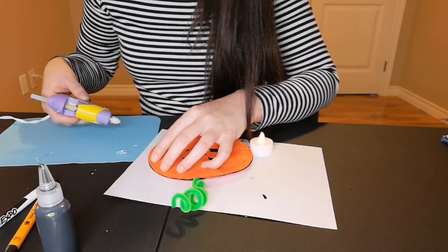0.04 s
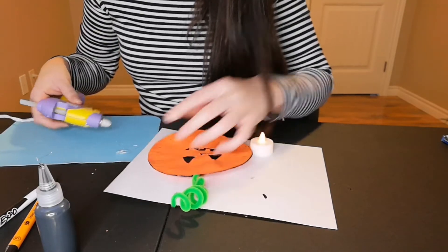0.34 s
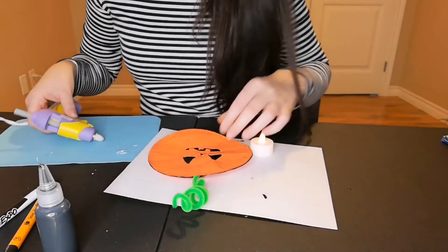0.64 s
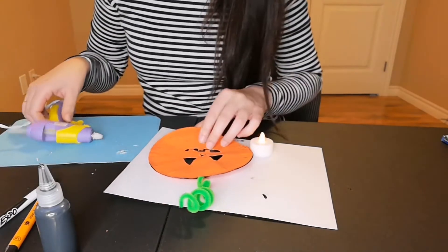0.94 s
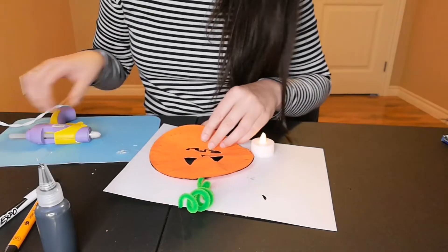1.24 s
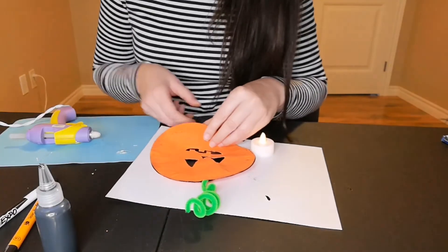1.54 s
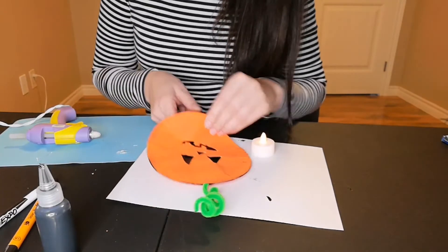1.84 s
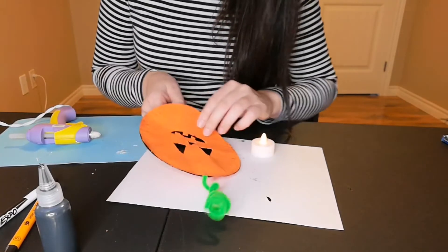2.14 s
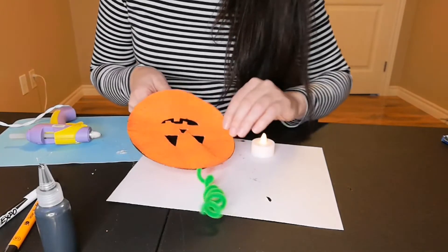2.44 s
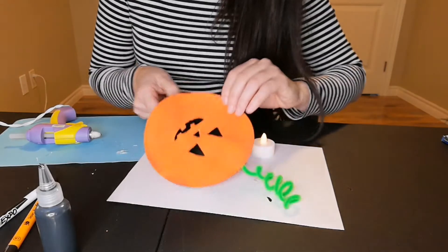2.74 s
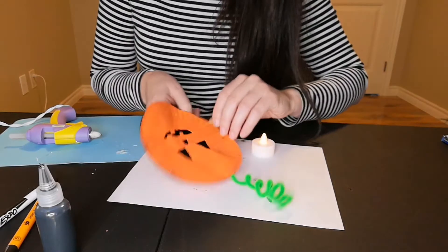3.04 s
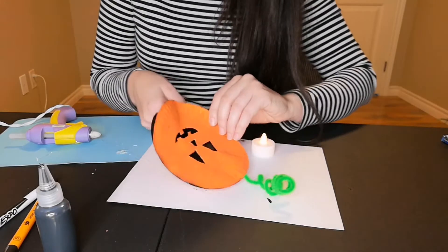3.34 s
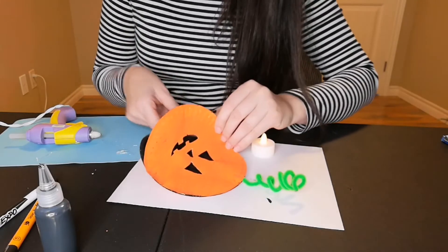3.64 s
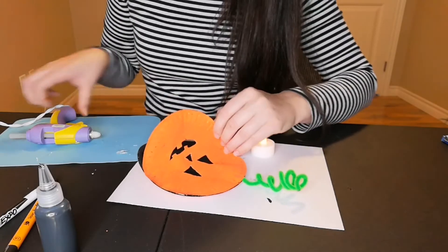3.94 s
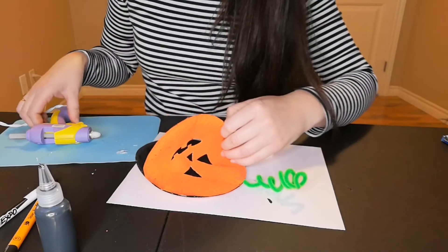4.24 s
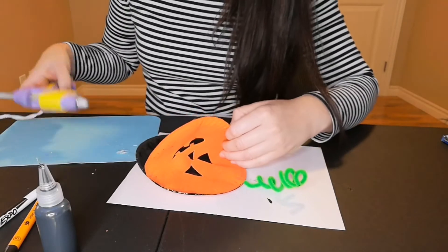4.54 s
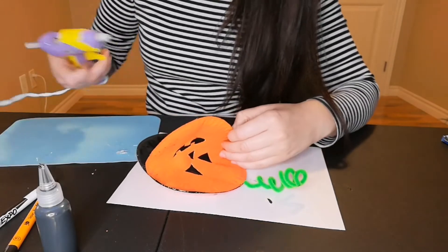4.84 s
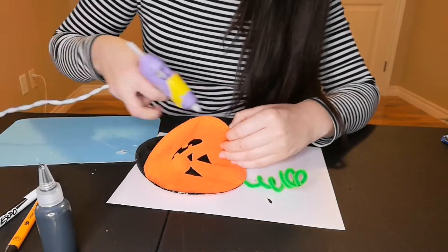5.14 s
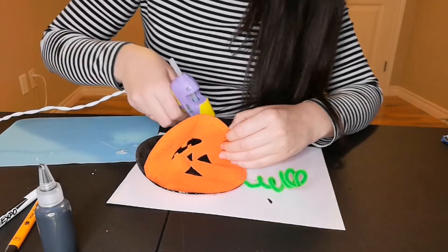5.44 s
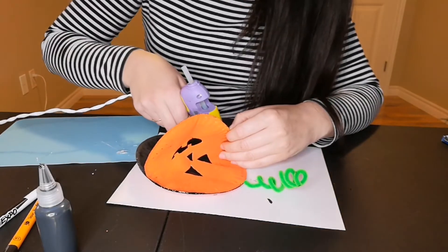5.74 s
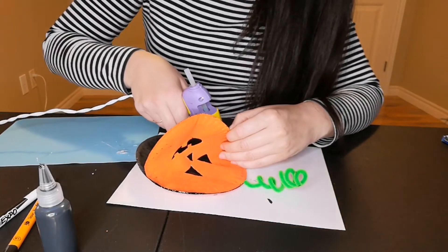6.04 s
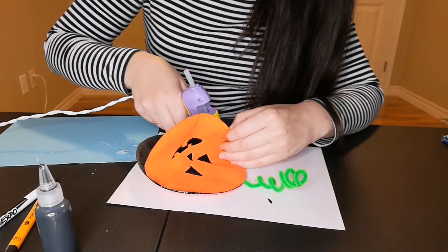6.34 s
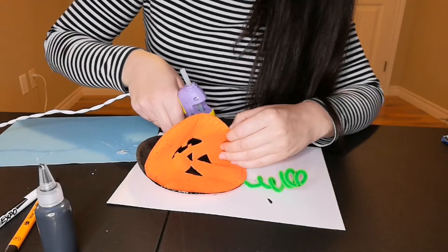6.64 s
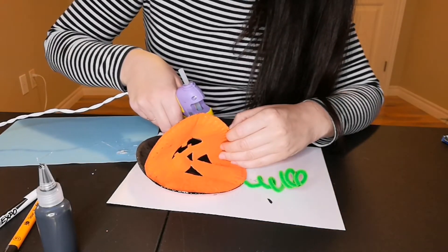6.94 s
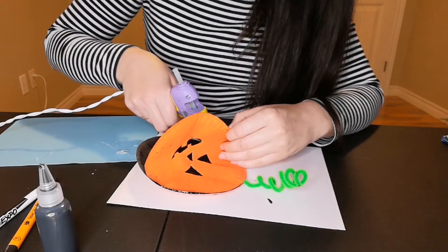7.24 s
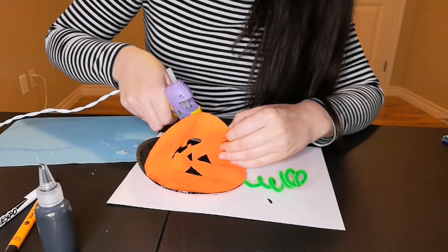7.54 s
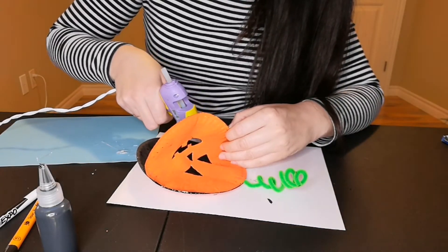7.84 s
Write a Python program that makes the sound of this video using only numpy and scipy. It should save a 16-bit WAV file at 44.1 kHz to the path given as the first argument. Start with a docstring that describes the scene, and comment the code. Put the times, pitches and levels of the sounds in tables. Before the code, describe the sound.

Craft work is heard from nearby in a bare, echoing room, over a faint low hum, rumble and hiss. In the first half second a plastic glue gun gives several light, sharp clicks, followed by soft bumps. At about 1.2 seconds it is set down with a double knock, the loudest sound, briefly ringing the table top. From 1.5 to 4.2 seconds a paper plate is turned and slid over a sheet of paper in quiet, uneven rustles and flutters, with single clicks near 2.8 and 3.6 seconds. From 4.3 to 5.4 seconds the gun is picked up, slightly to the left, with a busy run of plastic clicks, small knocks and its cord juddering over the table. The trigger ticks three times between 5.6 and 5.9 seconds, each louder. After that only the faint hum and hiss remain until about 8 seconds.

```python
"""A bare, echoing room, craft work at a table, over faint mains hum, rumble and hiss.
A paper plate is lifted, turned and slid over a sheet of paper: fibres slip, the plate flutters.
A plastic glue gun clicks and is set down with a double knock that rings the table top.
It is picked up again, its cord juddering over the table, and squeezed: the trigger ticks."""
import sys
import numpy as np
from scipy import signal
from scipy.fft import rfft, irfft, next_fast_len
from scipy.io import wavfile
from scipy.ndimage import uniform_filter1d, map_coordinates

SR = 44100
rng = np.random.default_rng(int(sys.argv[2]) if len(sys.argv) > 2 else 0)


def transcribe(signal):
    """Save signal, clipped to [-1, 1], as a 16-bit WAV file at the path in sys.argv[1]."""
    frames = np.atleast_2d(signal).T
    limited = np.clip(frames, -1, 1)
    pcm = np.round(limited * 32767).astype(np.int16)
    wavfile.write(sys.argv[1], SR, pcm)


N = 356679
GUN_LEAD_MS, PLATE_LEAD_MS = 0.16, -0.027  # left ear ahead of right

# hard plastic contact spectrum: freq_hz, level_db
CRACK_SPECTRUM = [(200, -34), (550, -19.5), (1200, -18), (1800, -6), (2200, -5.5), (2700, 0), (3400, -3.5),
                  (4100, -4), (5800, -3.5), (7600, -3.5), (9000, -7.5), (10800, -9.5), (15000, -20.5)]


def amp(db):
    """Decibels to gain."""
    return 10 ** (np.asarray(db) / 20)


def unit(x):
    """Scale to rms 1."""
    return x / np.sqrt(np.mean(x ** 2) + 1e-20)


def along(points, hz):
    """Interpolate (freq_hz, value) points on a log axis."""
    freqs_hz, values = np.transpose(points)
    return np.interp(np.log(hz + 1), np.log(freqs_hz + 1), values)


def wobble(rate_hz):
    """Smooth random curve, rate_hz knots a second."""
    knots = rng.standard_normal(int(N * rate_hz / SR) + 4)
    return map_coordinates(knots, [np.arange(N) * rate_hz / SR])


def filtered(x, response):
    """Zero-phase filter with gain response(hz)."""
    n = x.shape[-1]
    size = next_fast_len(n + 8192)
    return irfft(rfft(x, size) * response(np.fft.rfftfreq(size, 1 / SR)), size)[..., :n]


def coloured(x, spectrum):
    """Shape by a (freq_hz, level_db) spectrum; rms 1."""
    return unit(filtered(x, lambda hz: amp(along(spectrum, hz))))


def treble(x, edge_hz=4600):
    """High-pass."""
    return filtered(x, lambda hz: 1 - 1 / (1 + (hz / edge_hz) ** 4))


def peak(offset, half_width):
    """Resonance curve of height 1."""
    return 1 / (1 + (offset / half_width) ** 2)


def add(track, start_s, sound):
    """Mix a sound in at start_s."""
    part = track[:, round(start_s * SR):][:, :sound.shape[-1]]
    part += sound[:, :part.shape[-1]]


def ring(modes, t, scatter_db, spread_hz=450):
    """Damped modes at scattered levels; phase between the ears widens with frequency."""
    out = np.zeros((2, len(t)))
    for hz, db, t60_s in modes:
        phase = np.arctan(hz / spread_hz) * rng.choice([-1, 1]) * np.array([[.5], [-.5]])
        envelope = amp(db + scatter_db * rng.standard_normal() - 60 * t / t60_s)
        out += envelope * np.sin(2 * np.pi * hz * t + phase)
    return out


def grains(rate_hz, spread_db):
    """Stick-slip: tiny releases, random in time and size."""
    slips = (rng.random(N) < rate_hz / SR) * rng.standard_normal(N)
    return unit(slips * amp(spread_db * np.clip(rng.standard_normal(N), -2, 2)))


def stroke(start_s, rise_s, release_s):
    """Hand push: speed builds, then falls 27 dB per release_s."""
    age_s = np.arange(N) / SR - start_s
    attack = np.sin(np.pi / 2 * np.clip(age_s / rise_s, 0, 1)) ** 2
    return attack * amp(-27 * np.maximum(age_s - rise_s, 0) / release_s)


def snap(gain, size=2048):
    """Minimum-phase pulse shaped by gain(hz); energy 1, padded to 1 s."""
    cepstrum = irfft(np.log(np.maximum(gain(np.fft.rfftfreq(size, 1 / SR)), 1e-6)))
    cepstrum[1:size // 2] *= 2
    cepstrum[size // 2 + 1:] = 0
    pulse = irfft(np.exp(rfft(cepstrum)))
    return np.pad(pulse / np.linalg.norm(pulse), (0, SR - size))


def skidding(colour, skid_db=14, t60_s=0.01, size=2048):
    """Parts crack and skid as they meet: spread in time, same colour; energy 1."""
    t = np.arange(size) / SR
    skid = rng.standard_normal(size) * amp(-60 * t / t60_s)
    touch = (t == 0) + amp(skid_db) * skid / np.linalg.norm(skid)
    ripple = np.sqrt(np.abs(uniform_filter1d(np.abs(rfft(touch)) ** 2, size=3)))
    contact = signal.fftconvolve(snap(lambda hz: colour(hz) / ripple, size), touch)[:SR]
    return contact / np.linalg.norm(contact)


def in_room(x, wet_db, left_db, lead_ms, mono_hz=430):
    """Direct sound plus a diffuse tail, alike at both ears only in the bass."""
    # room decay: freq_hz, t60_s
    decay = [(100, 0.66), (400, 0.55), (1500, 0.86), (4000, 0.57), (8000, 0.48), (15000, 0.26)]
    hz, t, tail = signal.stft(rng.standard_normal((2, SR * 3 // 4)), SR, nperseg=256)
    tail = tail * amp(-60 * t / along(decay, hz)[:, None]) * (1 - np.exp(-t / 0.0025))
    tail *= 1 + np.exp(-t / 0.0038)  # table and near walls answer first
    width_rad = np.arccos(peak(hz[:, None], mono_hz)) / 2
    mid, side = signal.istft(tail * np.array([np.cos(width_rad), np.sin(width_rad)]), SR, nperseg=256)[1]
    response = amp(wet_db) * np.array([mid + side, mid - side]) / np.linalg.norm(mid + side)
    lead_samples = np.array([[.5], [-.5]]) * lead_ms * SR / 1000
    direct = np.sinc(np.arange(-16, 17) + lead_samples) * np.hanning(33)
    add(response, 0, direct)
    heard = signal.fftconvolve(x[None], response, axes=1)[:, :len(x)]
    return heard * amp([[left_db / 2], [-left_db / 2]]) / np.sqrt(1 + amp(wet_db) ** 2)


def moving(x, wet_db, left_db, lead_ms, spots=3):
    """Moving source: crossfades among spots, each with its own echoes."""
    shares = np.array([wobble(45) for _ in range(spots)])
    shares /= np.linalg.norm(shares, axis=0)
    return sum(in_room(np.roll(x * share, 100 * k), wet_db, left_db, lead_ms)
               for k, share in enumerate(shares))


def patchy(x, depth_db):
    """A rub's colour shifts as the contact point moves."""
    frames = signal.stft(x, nperseg=512)[2]
    patches = uniform_filter1d(rng.standard_normal(frames.shape), size=6, axis=0)
    patches = uniform_filter1d(patches, size=22, axis=1)
    return unit(signal.istft(frames * amp(depth_db * unit(patches)), nperseg=512)[1][:N])


def background():
    """Mains hum, uneven low rumble, soft hiss."""
    # hum tones: freq_hz, level_db
    hum_tones = [(121.5, 3.5), (68, -12), (692, -13.5)]
    # slow swell and fade: time_s, level_db
    hum_levels = [(0, -77.5), (3, -71), (5.7, -68.5), (6.5, -68.5), (7.5, -75.5)]
    hiss_levels = [(1.5, -68), (5.7, -67), (8, -72)]
    # room noise spectra: freq_hz, level_db
    rumble_spectrum = [(11, -43), (18, -10), (59, 1.5), (86, -28), (102, -5), (123, -7.5), (146, -42),
                       (200, -29), (260, -42.5), (440, -120)]
    hiss_spectrum = [(94, 4.5), (160, -1), (183, -2), (205, -10), (239, -2), (284, -10.5), (319, -3.5),
                     (495, -10.5), (534, -7.5), (698, -7), (1500, -16), (3420, -19.5), (8400, -30.5),
                     (15500, -37.5)]
    t = np.arange(N) / SR
    hum = sum(amp(db + 1.7 * wobble(1.6)) * np.sin(2 * np.pi * hz * t + 0.32 * wobble(2.6))
              for hz, db in hum_tones)
    hum *= amp(np.interp(t, *np.transpose(hum_levels)))
    rumble = coloured(rng.standard_normal(N) + 0.2 * rng.standard_normal((2, N)), rumble_spectrum)
    rumble *= amp(-70 + 1.6 * wobble(23))
    hiss = coloured(.5 * rng.standard_normal(N) + rng.standard_normal((2, N)), hiss_spectrum)
    hiss *= amp(np.interp(t, *np.transpose(hiss_levels)))
    return (hum + rumble) * amp([[2.5], [-3.5]]) + hiss * amp([[1.2], [-1.2]])


def drags():
    """Gun, cord and fingers judder over the table: coarse slips drive the board, fine ones scratch."""
    # rubs: start_s, rise_s, release_s, body_db, scratch_db
    rubs = [(0, 0.049, 0.54, -75, -72.5), (0.809, 0.051, 0.14, -65, -66),
            (4.583, 0.01, 0.079, -48.5, -48.5), (4.64, 0.05, 1, -55, -59),
            (4.862, 0.011, 0.12, -49.5, -48.5), (4.96, 0.038, 0.17, -57, -47),
            (5.072, 0.0048, 0.028, -44, -44.5), (5.248, 0.0067, 0.14, -41.5, -62)]
    # board and surface spectra: freq_hz, level_db
    body_spectrum = [(59, -67.5), (100, -4), (140, 5), (193, -6), (224, 3.5), (260, -10), (374, -5),
                     (417, -19.5), (561, 0), (1310, -13.5), (2500, -21.5), (3250, -51.5), (5500, -120)]
    scratch_spectrum = [(700, -3.5), (1200, -0.5), (3000, -3), (5000, -6.5), (8000, -25), (11000, -13),
                        (15000, -65)]
    body, scratch = np.zeros(N), np.zeros(N)
    for start_s, rise_s, release_s, body_db, scratch_db in rubs:
        speed = stroke(start_s, rise_s, release_s)
        body += amp(body_db) * speed
        scratch += amp(scratch_db) * speed
    judder = amp(2 * wobble(45))
    body *= coloured(judder * grains(rate_hz=600, spread_db=2.5), body_spectrum)
    fine_slips = patchy(judder * grains(rate_hz=1900, spread_db=2), depth_db=1.5)
    scratch *= coloured(fine_slips, scratch_spectrum)
    return (in_room(body, wet_db=-4, left_db=9, lead_ms=GUN_LEAD_MS)
            + in_room(scratch, wet_db=2, left_db=3, lead_ms=GUN_LEAD_MS))


def plate():
    """Paper fibres catch and slip as the plate turns; bending adds a hollow flutter."""
    # strokes on paper and fingers:
    # start_s, rise_s, release_s, level_db, treble_db, flex_db, band_hz, band_db
    strokes = [(0, .01, 0.54, -80, -8, -66.5, 2520, -8), (.88, 0.049, 1, -80.5, 7.5, -81, 3350, 8.5),
               (1.455, 0.045, 0.087, -65, -3, -77.5, 4800, 3), (1.5, .025, 0.031, -56.5, -1, -67, 2182, 5),
               (1.725, 0.017, .015, -57, -6, -62, 3960, 3), (1.76, 0.045, 0.23, -63, -5, -65.5, 4000, -5),
               (1.89, .019, 0.21, -57.5, -1, -85, 2830, -0.5), (2.029, .059, 0.39, -60.5, -2, -67, 3630, 5),
               (2.173, 0.044, 0.07, -51.5, 5, -68, 5150, 3),
               (2.24, 0.083, 0.83, -63.5, 2.5, -100, 4520, 5.5),
               (2.7, 0.079, 0.76, -67, -8, -82, 2950, 2.5), (2.826, 0.03, 0.15, -59, -9, -61, 3470, 2),
               (2.92, 0.027, 0.063, -60, -11, -75, 2700, 0), (3.01, 0.035, .12, -77.5, -2, -86, 3480, 21),
               (3.11, 0.014, 0.13, -65.5, -1.5, -73, 3280, 1),
               (3.164, 0.022, 0.028, -59, -6, -64, 3000, -12),
               (3.259, 0.01, 0.29, -66.5, -1, -72.5, 4000, 1.5),
               (3.29, 0.013, 0.11, -64.5, -1.5, -72.5, 4000, 10.5),
               (3.56, 0.042, .05, -64.5, 1.5, -69, 3500, 6), (3.614, 0.0082, 0.28, -59, -9, -78, 3430, 2),
               (4, 0.1, 0.12, -65, -0.5, -78, 3200, -1), (4.15, 0.032, 0.024, -59, -2.5, -68.5, 2880, 2)]
    # friction and bending spectra: freq_hz, level_db
    paper_spectrum = [(350, -41), (600, -40), (706, -3.5), (855, -9.5), (1060, -4.5), (2190, -4),
                      (2750, -2), (3330, -2), (4490, -3.5), (7430, -8), (8630, -14), (11000, -7.5),
                      (14500, -26.5), (15500, -21.5)]
    flutter_spectrum = [(80, -26.5), (130, -0.5), (195, -2), (260, -6.5), (350, -1.5), (460, -7.5),
                        (650, -9), (1200, -19.5), (3000, -60)]
    half_band_oct = 0.19
    slips = grains(rate_hz=9000, spread_db=2.5) * amp(1.5 * wobble(70) + 1.3 * wobble(22))
    crackle = unit(treble(grains(rate_hz=170, spread_db=3.5), edge_hz=7000))  # larger fibres snap
    fibres = coloured(slips + amp(-1) * crackle, paper_spectrum)
    highs = treble(fibres)
    slide, bending = np.zeros(N), np.zeros(N)
    for start_s, rise_s, release_s, db, treble_db, flex_db, band_hz, band_db in strokes:
        speed = stroke(start_s, rise_s, release_s)
        span = slice(round(start_s * SR), round(start_s * SR) + 2 * SR)
        friction = fibres[span] + (amp(treble_db) - 1) * highs[span]
        swish = lambda hz: amp(band_db * peak(np.log2((hz + 1) / band_hz), half_band_oct))
        slide[span] += filtered(friction, swish) * amp(db) * speed[span]
        bending += amp(flex_db) * speed
    flutter = coloured(grains(rate_hz=810, spread_db=2), flutter_spectrum) * bending
    return (moving(slide, wet_db=1.5, left_db=1.5, lead_ms=PLATE_LEAD_MS)
            + in_room(flutter, wet_db=-1.5, left_db=2, lead_ms=PLATE_LEAD_MS))


def trigger():
    """Each squeeze ticks and briefly rings the lever and its spring."""
    # squeezes: start_s, level_db, treble_db
    squeezes = [(5.6615, -55, -12), (5.7214, -49, -8), (5.8345, -41, -3)]
    # lever and spring modes: freq_hz, level_db, t60_s
    lever_modes = [(760, -4, 0.0073), (1630, -6.5, 0.02), (2400, -2, 0.011), (2900, 0.5, 0.011),
                   (4300, -0.5, 0.011), (4370, -3, .008), (6800, -23, .015), (7900, -21, .012),
                   (11050, -10, 0.0081)]
    out, t = np.zeros((2, N)), np.arange(SR) / SR
    for start_s, db, treble_db in squeezes:
        lever = ring(lever_modes, t, scatter_db=2)[0]
        contact = skidding(lambda hz: amp(along(CRACK_SPECTRUM, hz)))
        tick = lever / np.linalg.norm(lever) + amp(-8.5) * contact
        tick += (amp(treble_db) - 1) * treble(tick, edge_hz=3600)
        add(out, start_s, amp(db + 13) * in_room(tick, wet_db=-1, left_db=4.5, lead_ms=0))
    return out


def clicks():
    """Small hard contacts ring the gun's hollow shell and the struck part, which then chatters."""
    # gun parts, cord, plate rim; a hand in the way leaves mostly room:
    # start_s, level_db, treble_db, ring_hz, ring_db, room_db
    contacts = [(0.1142, -45, -5, 2580, 0, 2), (.1646, -38, -13, 2860, -1, -1),
                (0.182, -36, 4.5, 10300, 6, 2.5), (0.3077, -34, -7, 4150, -6, 9),
                (0.3355, -29.5, -2.5, 3900, -3, -3), (0.3414, -29.5, -0.5, 2200, 0, 0.5),
                (0.639, -48.5, -47, 1590, 39, 2), (1.146, -37.5, -8.5, 1550, 23, 16),
                (1.205, -27.5, 1, 1520, 9, 25), (1.2199, -34, -7, 5400, -6, 2),
                (1.282, -37, -10, 7500, -12, 14), (1.373, -42, -10, 5940, 0, 12),
                (1.744, -49.5, -10, 3850, 9, -6.5), (2.154, -41, -17, 1710, 16, 6),
                (2.836, -37, -6, 5560, 13, 20), (3.16, -50, 0, 3800, 9, 3),
                (3.6127, -34.5, 2, 7250, 4, -0.5), (4.361, -36, -2.5, 10900, 9, 5),
                (4.37, -42, -2, 2600, 7, 0), (4.5248, -50, 1, 4300, -4, 8.5),
                (4.546, -43.5, -19, 1690, 17, 13), (4.584, -37, -15, 4840, 11, 9),
                (4.6137, -31, 1, 2900, 3, 0), (4.7395, -46, -10, 1800, 4, 0),
                (4.7483, -36.5, 2, 5700, -7, 10), (4.866, -33.5, -8, 1840, 8, 6),
                (4.8766, -29.5, 4, 2940, 13, -1), (4.947, -26.5, -0.5, 2260, 9, 0),
                (5.0229, -26.5, -7, 2980, 15, -3.5), (5.09, -36, -7, 3840, 3, 6),
                (5.1191, -39, -20, 2400, 4, -11), (5.2437, -42, -21, 1200, 16, -3),
                (5.251, -38, -10.5, 3070, 14, -11), (5.324, -45, -6, 4800, 5, 11),
                (5.3354, -40.5, -33, 4530, 14, 16)]
    # plastic shell resonances: centre_hz, half_width_hz, peak_db
    shell_peaks = [(1950, 180, 4), (2600, 130, 3), (3350, 200, -3), (4150, 190, 5.5), (4700, 150, 2),
                   (5800, 140, 3), (6900, 120, 2.5), (7950, 110, 5), (9000, 450, -3), (10500, 150, 4)]
    # working hand position: time_s, left_over_right_db
    hand_path = [(.3, 0.5), (4.3, 3), (5.05, 6.5), (5.8, 3)]
    chatter_db, chatter_t60_s = -16.5, 0.037
    shell = lambda hz: amp(sum(peak_db * peak(hz - centre_hz, half_width_hz)
                               for centre_hz, half_width_hz, peak_db in shell_peaks))
    out, t = np.zeros((2, N)), np.arange(SR // 10) / SR
    for start_s, db, treble_db, ring_hz, ring_db, room_db in contacts:
        left_db = np.interp(start_s, *np.transpose(hand_path))
        part = lambda hz: 1 + amp(ring_db) * peak(hz / ring_hz - 1, half_width=0.035)
        tilt = lambda hz: amp(treble_db / (1 + (5500 / (hz + 1)) ** 3))  # harder is brighter
        colour = lambda hz: amp(along(CRACK_SPECTRUM, hz)) * shell(hz) * part(hz) * tilt(hz)
        crack = in_room(skidding(colour), room_db, left_db, lead_ms=GUN_LEAD_MS * rng.random())
        noise = 0.11 * rng.standard_normal(len(t)) + rng.standard_normal((2, len(t)))
        chatter = unit(filtered(noise, colour)) * amp(-60 * t / chatter_t60_s)
        add(out, start_s, amp(db + 9.5) * crack)
        add(out, start_s, amp(db + chatter_db) * chatter * amp([[left_db / 2], [-left_db / 2]]))
    return out


def knocks():
    """Blows sound the struck spot, ring the table top and rattle the gun; soft contact dulls them."""
    # blows on the table: start_s, level_db, contact_cutoff_hz, board_db, pitch_hz
    blows = [(0.011, -66, 700, 5, 395), (.198, -70, 600, -17, 354), (.639, -58.5, 150, -13, 133),
             (0.66, -56, 135, 9, 129), (0.736, -61, 595, -10, 468), (0.818, -59, 453, -7, 352),
             (0.861, -57, 500, -4, 256), (.898, -58.5, 606, -16, 335), (1.124, -52, 129, 1, 132),
             (1.1426, -30.5, 306, -5, 167), (1.2047, -24.5, 1900, -1, 251), (1.2204, -39, 1180, -22, 366),
             (1.2805, -38, 1190, -8, 385), (2.055, -60, 260, -4, 188), (2.835, -59.5, 350, -5, 214),
             (2.926, -61, 300, -3, 212), (3.614, -58.5, 1140, -15, 470), (4.3, -53, 135, -18, 126),
             (4.438, -52.5, 116, 8, 124), (4.544, -46.5, 231, -4.5, 151), (4.583, -49.5, 1800, -12, 258),
             (4.609, -56, 600, -12, 250), (4.709, -53, 1200, -7, 282), (4.737, -53, 1180, -11, 606),
             (4.84, -55, 900, -13, 255), (4.866, -49, 2000, -12, 384), (4.987, -54, 1200, -16, 568),
             (5, -52, 2500, -12, 1020), (5.013, -51, 600, -25, 261), (5.068, -47, 1480, -31, 291),
             (5.243, -51, 2020, -24, 516), (5.258, -51, 1510, -17, 476), (5.273, -56, 447, 15, 256),
             (5.307, -55, 1570, -13, 340), (5.336, -50, 2230, -12, 500), (5.359, -70, 688, 6, 316),
             (5.5, -63, 895, -28, 266)]
    # table top modes: freq_hz, level_db, t60_s
    board_modes = [(130.3, 3.5, .25), (141, 5, .2), (220.5, -4.5, .45), (265.7, -4, .45), (323.5, -3, .5),
                   (358, -4, .15), (400.3, 1, .4), (423, -6, .5), (502, -3, .5), (633, -15, .5),
                   (659, -15, .45), (775, -16, .5), (931, -21, .45), (1031, -25, .45), (1526, -21, .5),
                   (2354, -25, .35)]
    # struck spot modes: pitch_ratio, level_db, t60_s
    spot_modes = [(1, -4.5, 0.096), (1.5, -7.5, 0.053), (1.95, -11, 0.096), (3.1, -21, 0.13),
                  (6, -9, 0.025)]
    # gun clack and rattle spectrum: freq_hz, level_db
    gun_spectrum = [(150, -8), (350, 0), (520, -7), (750, -5.5), (1100, -16), (1550, -16), (2000, -19),
                    (3500, -19.5), (6000, -27.5), (10000, -25), (15000, -28)]
    low_cut = signal.butter(3, 92, "high", fs=SR, output="sos")  # a thin board radiates no deep bass
    out, t = np.zeros((2, N)), np.arange(SR) / SR
    for start_s, db, contact_cutoff_hz, board_db, pitch_hz in blows:
        board = ring(board_modes, t, scatter_db=1.5) * (1 - np.exp(-t / 0.004))
        pulse = snap(lambda hz: amp(along(gun_spectrum, hz)))
        clack = in_room(pulse, wet_db=6.5, left_db=3, lead_ms=GUN_LEAD_MS)
        rattle = coloured(rng.standard_normal((2, SR)), gun_spectrum) * amp(-60 * t / 0.015)
        tuned_modes = [(ratio * pitch_hz, mode_db, t60_s) for ratio, mode_db, t60_s in spot_modes]
        spot = ring(tuned_modes, t, scatter_db=2.5)
        wood = (amp(board_db) * board + amp(8) * spot) * amp([[2], [-2]])
        blow = wood + amp(31) * clack + amp(-2) * rattle
        softened = signal.sosfilt(signal.butter(2, contact_cutoff_hz, fs=SR, output="sos"), blow)
        blow = signal.sosfilt(low_cut, softened + amp(-50) * blow)  # a faint hard edge remains
        onset_rms = np.sqrt(np.mean(blow[:, :SR // 30] ** 2))
        add(out, start_s, amp(db) * blow / onset_rms)
    return out


def scene():
    """Everything on and around the table."""
    return knocks() + clicks() + trigger() + plate() + drags() + background()


def record(dry):
    """Steep low-pass at 15.3 kHz."""
    return filtered(dry, lambda hz: 1 / (1 + (hz / 15300) ** 100))


dry = scene()
out = record(dry)
transcribe(out)
```